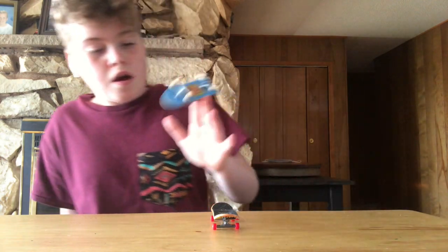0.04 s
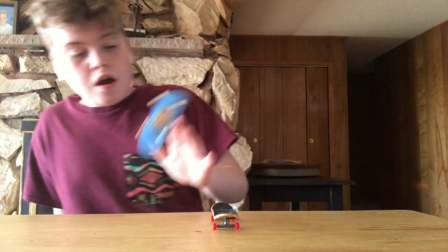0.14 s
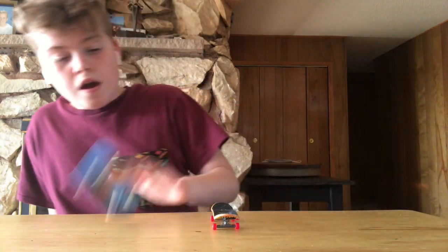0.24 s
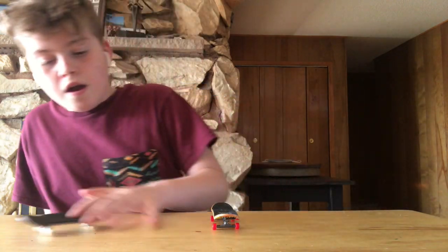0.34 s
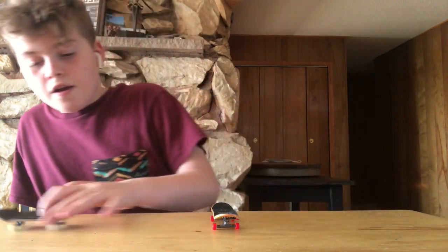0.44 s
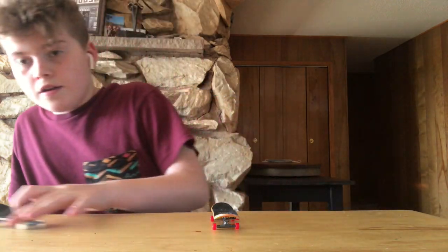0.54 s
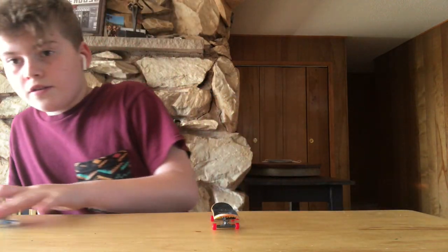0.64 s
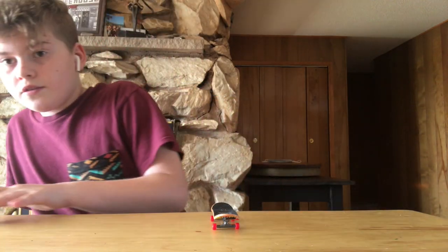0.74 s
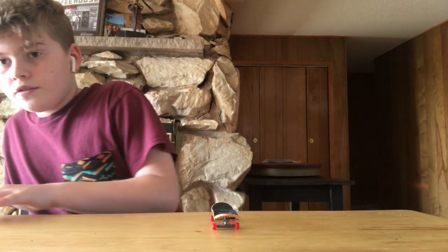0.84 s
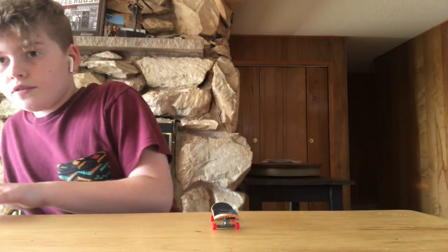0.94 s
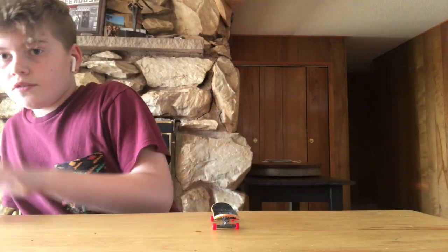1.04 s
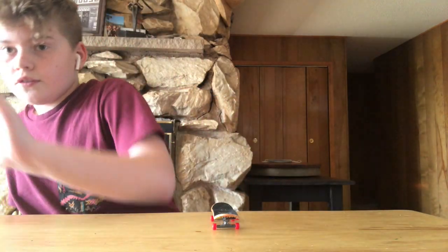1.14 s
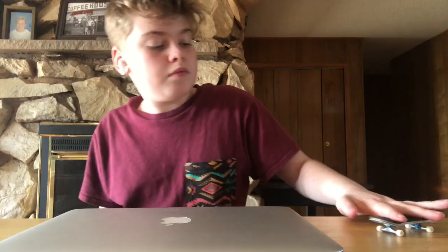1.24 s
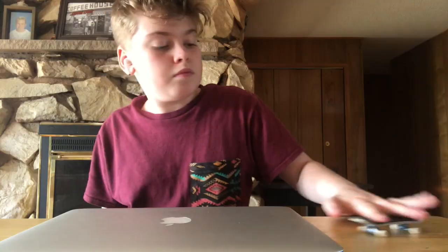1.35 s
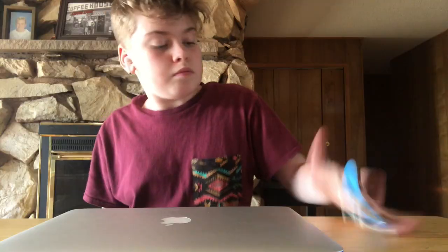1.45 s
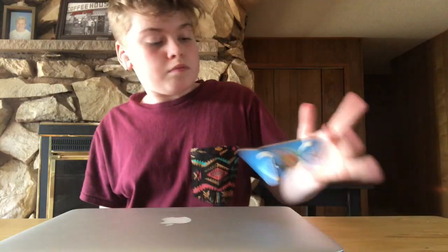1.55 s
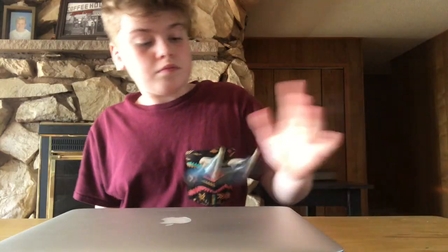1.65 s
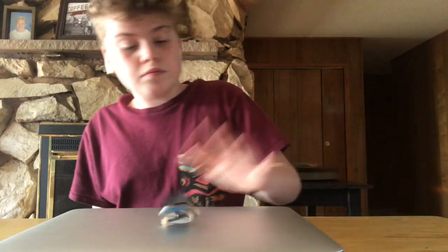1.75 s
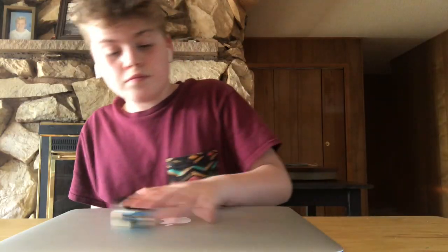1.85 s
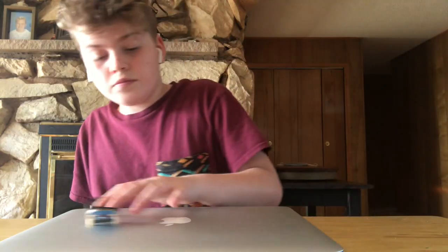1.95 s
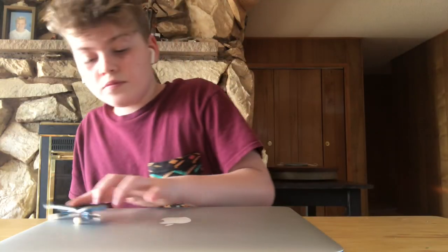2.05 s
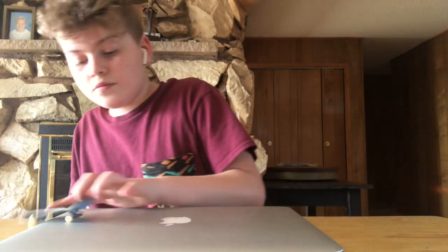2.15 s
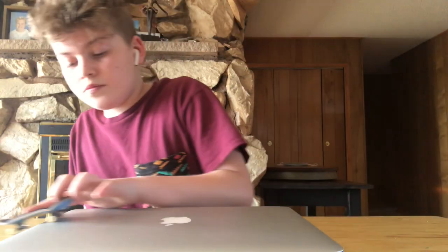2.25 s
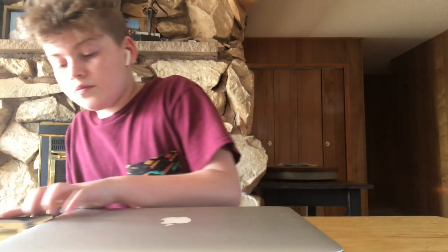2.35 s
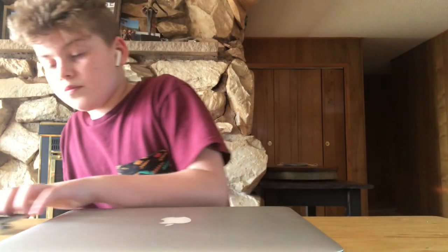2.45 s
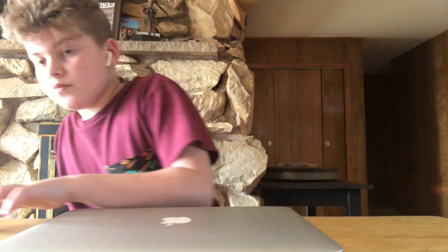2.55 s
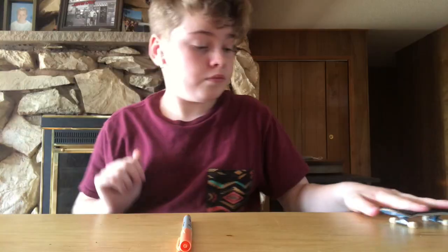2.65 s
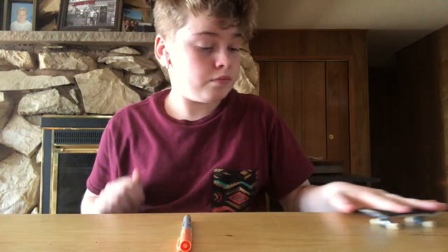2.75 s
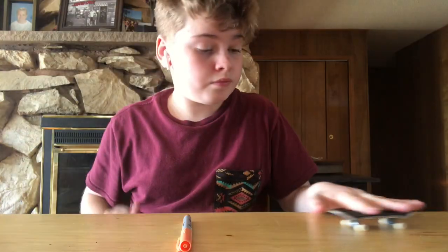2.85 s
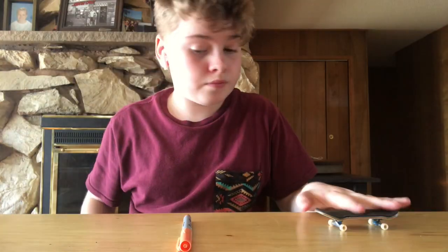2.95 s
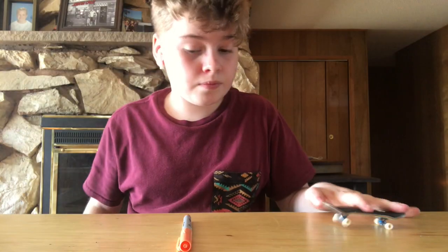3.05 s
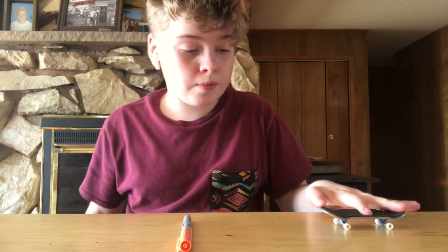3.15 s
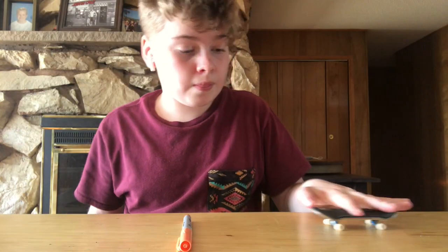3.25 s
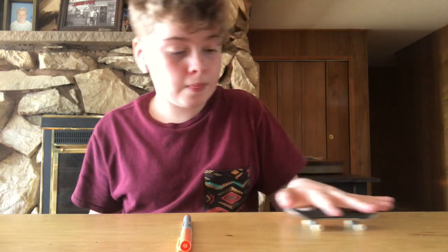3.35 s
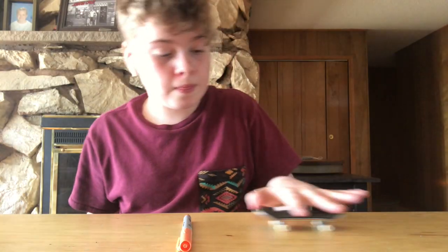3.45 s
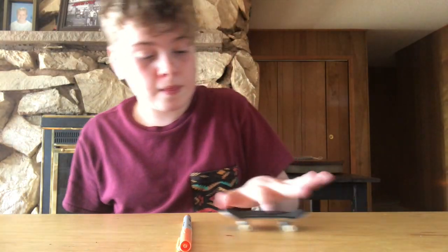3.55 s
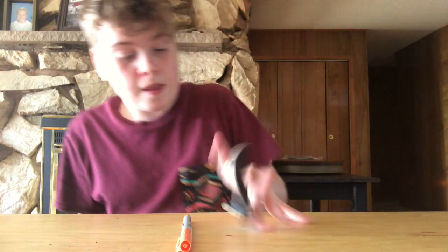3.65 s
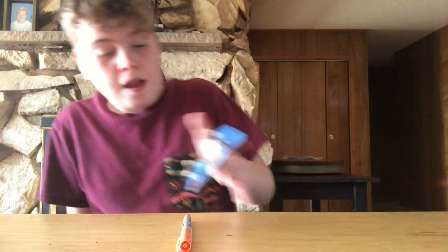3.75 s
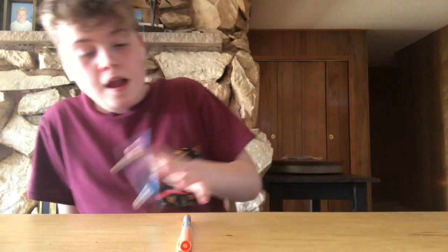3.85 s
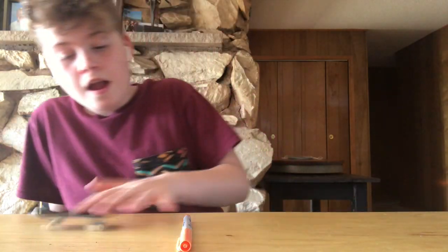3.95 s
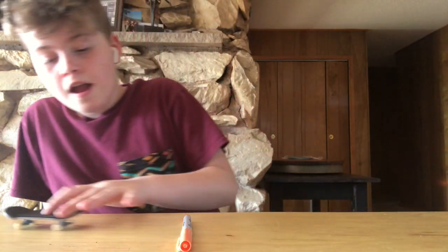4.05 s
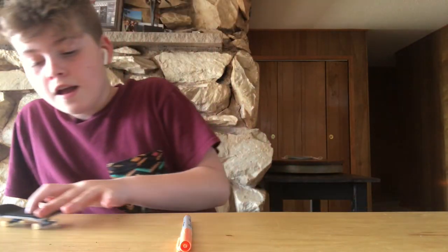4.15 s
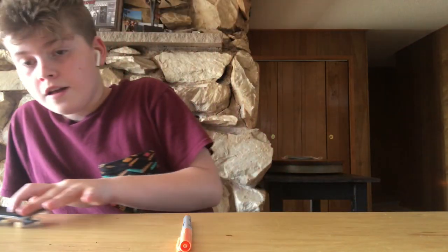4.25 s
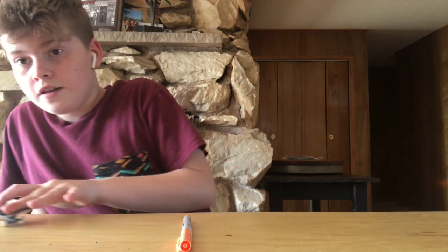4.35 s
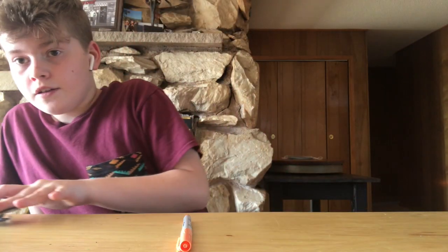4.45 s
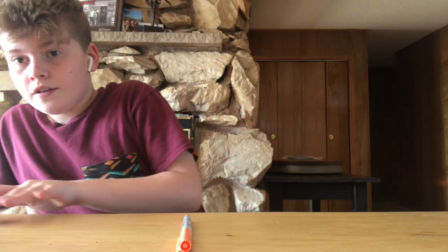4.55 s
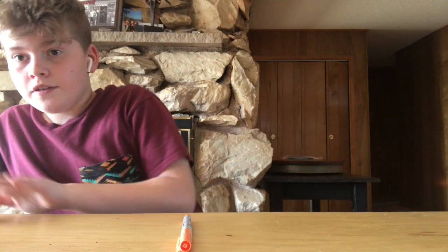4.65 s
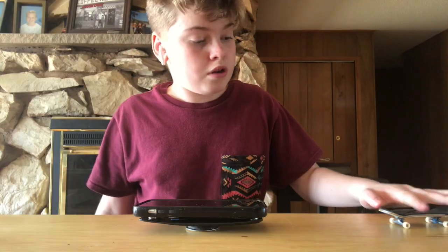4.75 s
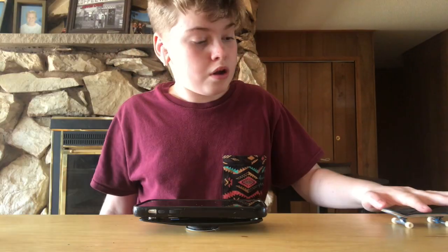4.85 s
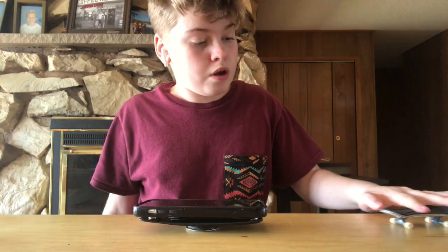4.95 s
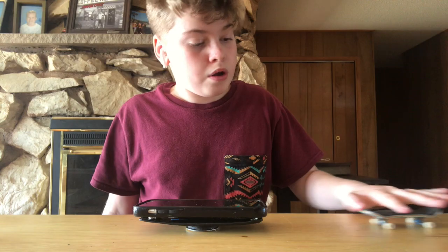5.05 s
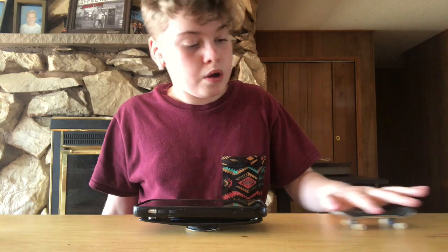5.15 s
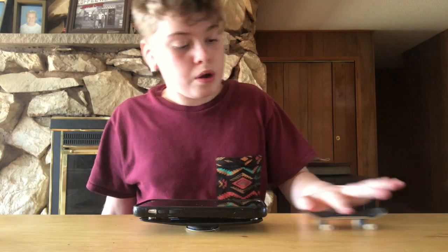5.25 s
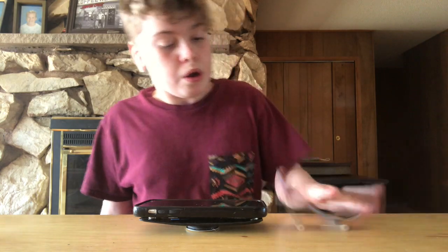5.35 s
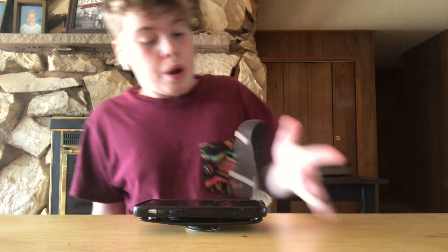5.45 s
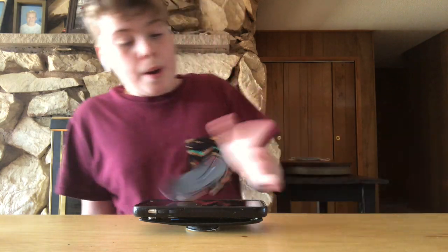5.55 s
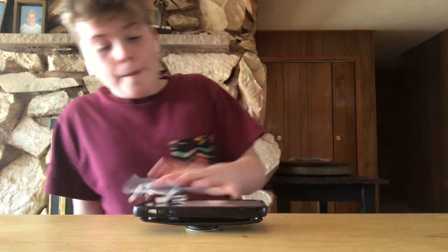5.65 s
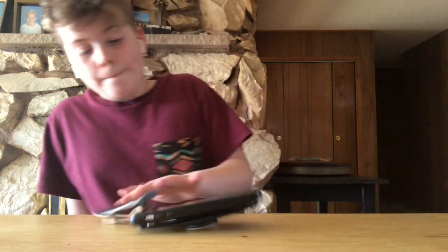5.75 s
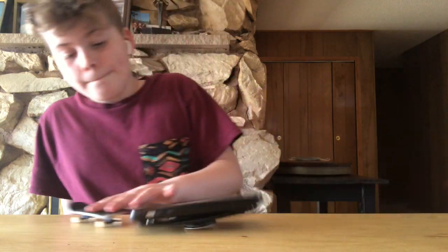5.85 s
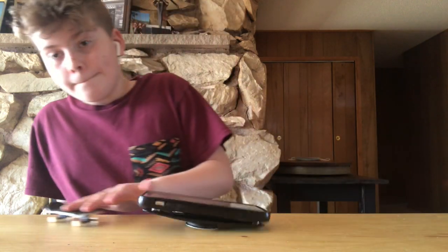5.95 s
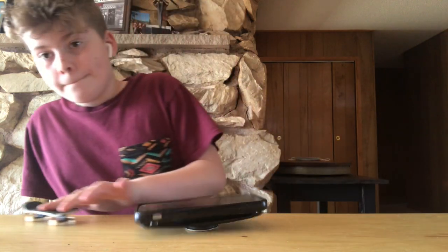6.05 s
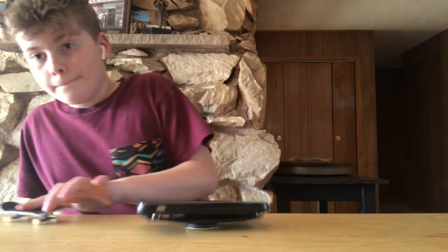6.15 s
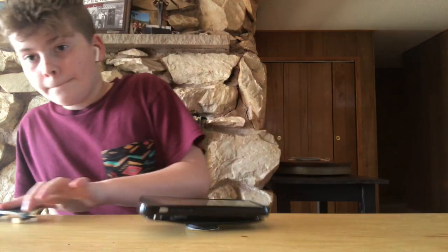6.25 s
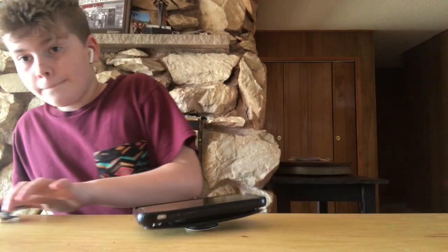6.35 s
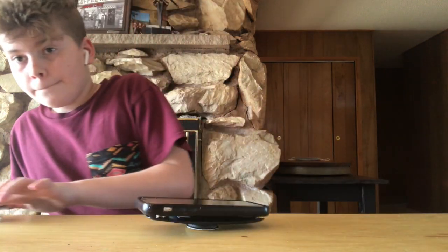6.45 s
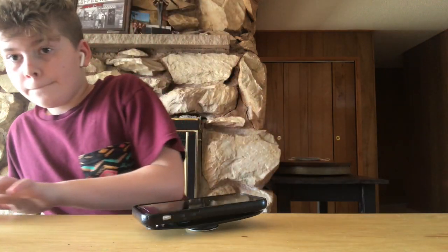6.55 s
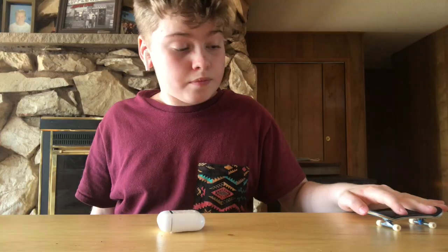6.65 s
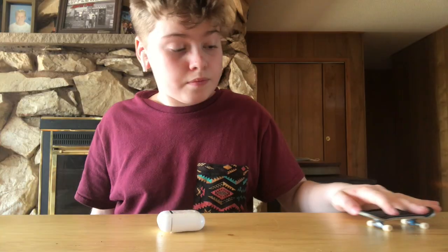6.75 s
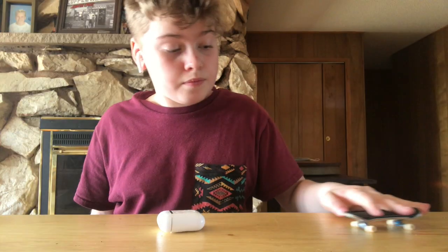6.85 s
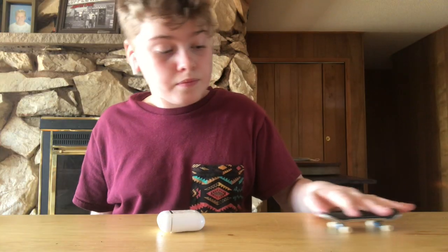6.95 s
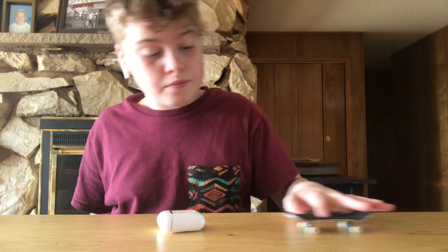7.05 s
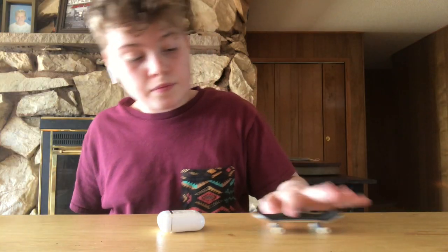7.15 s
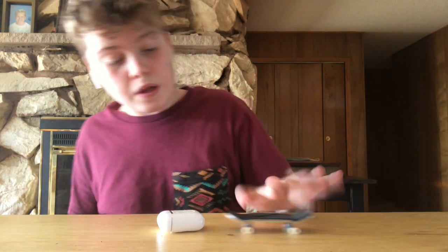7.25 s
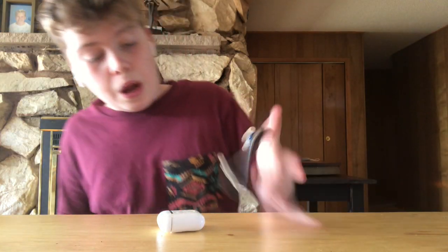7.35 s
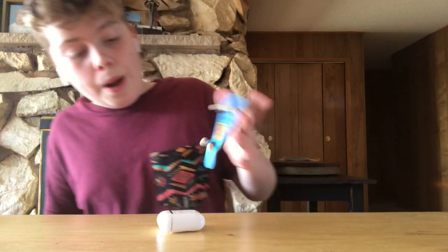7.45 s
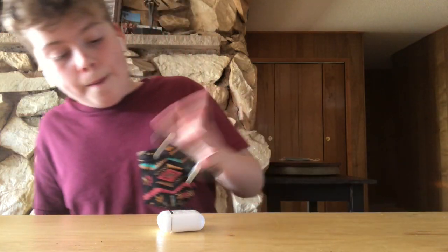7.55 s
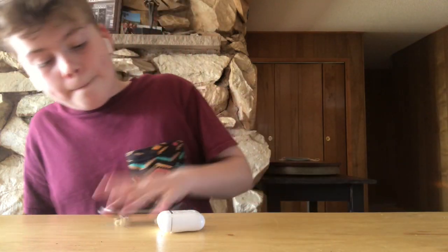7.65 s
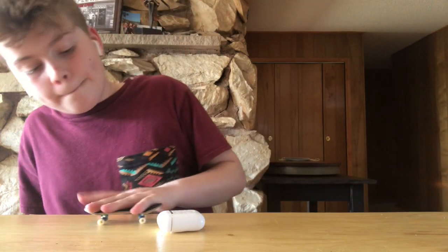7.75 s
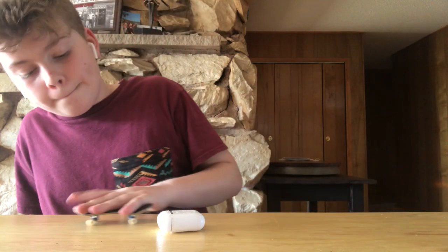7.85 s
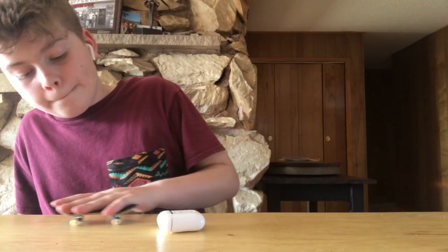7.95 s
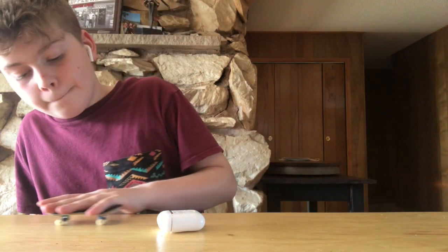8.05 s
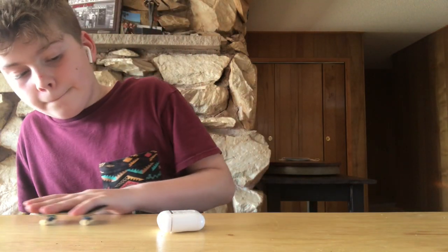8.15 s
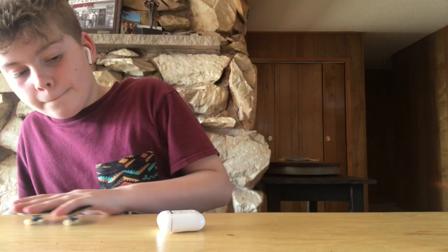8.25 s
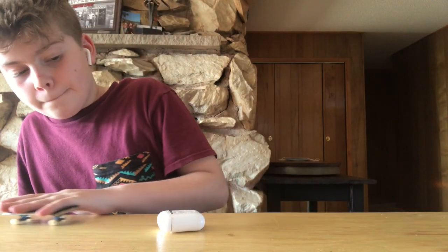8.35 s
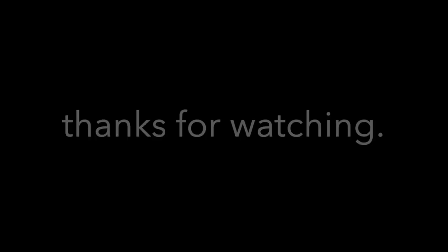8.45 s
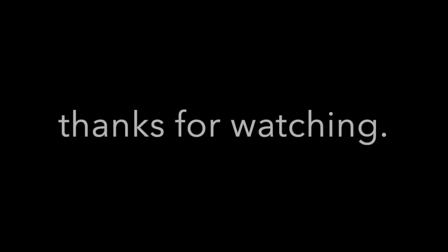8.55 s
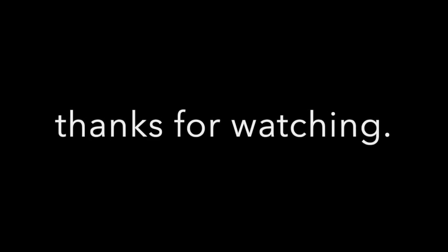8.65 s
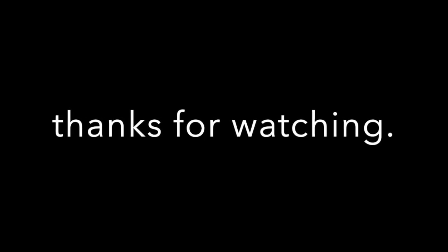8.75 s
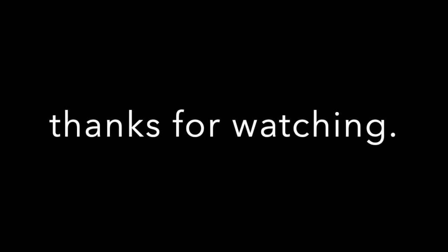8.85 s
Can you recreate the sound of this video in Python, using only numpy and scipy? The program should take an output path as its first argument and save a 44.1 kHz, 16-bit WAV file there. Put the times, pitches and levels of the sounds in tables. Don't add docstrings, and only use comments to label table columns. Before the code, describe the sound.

A finger-sized skateboard on a wooden table, close to a small microphone in a lively small room. Five attempts follow each other with tiny dips between: gritty wheel rolling, a sharp tail snap, a rattling landing, then fading roll-out. A soft, slowly beating low hum and air noise lie behind, until everything cuts to silence.

```python
import sys
import numpy as np
from scipy import signal
from scipy.fft import rfft
from scipy.io import wavfile
from scipy.ndimage import uniform_filter1d

SR = 44100
rng = np.random.default_rng(int(sys.argv[2]) if len(sys.argv) > 2 else 0)


def transcribe(signal):
    frames = np.atleast_2d(signal).T
    limited = np.clip(frames, -1, 1)
    pcm = np.round(limited * 32767).astype(np.int16)
    wavfile.write(sys.argv[1], SR, pcm)


def elevation(decibels):
    levels = np.asarray(decibels, float)
    return 10 ** (levels / 20)


N = 392483
T = np.arange(N) / SR
STEP_S = np.arange(0, N / SR, 1 / 500)
END_S = 8.439
TICK_RISE_S = .0002
LIFT_DB_PER_S = 500

# start_s, first_beat_s (from start until both motors are in phase)
TAKES = [
    (0, 0.033),
    (1.25, 0.145),
    (2.654, 0.099),
    (4.785, 0.166),
    (6.624, 0.209),
]


def evened(x):
    return x / np.sqrt(np.mean(x ** 2) + 1e-20)


def peaked(x, db):
    return elevation(db) * x / abs(x).max()


def read(points, hz):
    f, value = np.transpose(points)
    return np.interp(np.log(hz + 1), np.log(f + 1), value)


def add(mix, s, sound):
    part = mix[round(s * SR):][:len(sound)]
    part += sound[:len(part)]


def colour(x, points, size=2048):
    hz = abs(np.fft.fftfreq(size, 1 / SR))
    log_gain = np.log(elevation(np.maximum(read(points, hz), -90)))
    taps = np.fft.ifft(np.exp(log_gain - 1j * signal.hilbert(log_gain).imag)).real
    return signal.oaconvolve(x, taps[:size // 2])[:len(x)]


def drift(rate_hz):
    size = int(SR / rate_hz)
    return evened(uniform_filter1d(uniform_filter1d(rng.standard_normal(N), size), size))


def spread(x, shape):
    return shape * np.linalg.norm(x) / np.linalg.norm(shape)


def background():
    # shaft_hz, order1_db, order2_db, order3_db
    motors = [
        (58.8, -62, -73, -73),
        (53.4, -71.5, -74, -75),
    ]
    # hz, db_per_hz
    air_tone = [(30, -35.5), (50, -15.5), (80, -10), (130, 0), (200, -6.5), (350, -11), (500, -22),
                (1000, -23.5), (2000, -28.5), (6000, -36.5), (16000, -42)]
    # time_s, gain_db
    gain_curve = [(0, -1.5), (1.25, 0.5), (2.64, 1.5), (2.66, 7), (3.2, 6.5), (3.6, -0.5), (4.75, 0.5),
                  (6.6, 0), (8.44, 2.5)]
    air_db = -64.5
    start, together = np.transpose(TAKES)
    take = np.searchsorted(start, T, "right") - 1
    t = T - (start + together)[take]
    hum = np.zeros(N)
    for hz, *orders in motors:
        for k, db in enumerate(orders, start=1):
            level = np.sqrt(2) * elevation(db + 0.4 * k * drift(6.9))
            hum += level * np.cos(2 * np.pi * k * hz * t)
    air = evened(colour(rng.standard_normal(N), air_tone, size=8192))
    return elevation(np.interp(T, *np.transpose(gain_curve))) * (hum + elevation(air_db) * air)


def clack(db, hz, fizz_db, thud_db, contact_ms):
    # hz, db_per_hz
    deck_tone = [(900, -45.5), (1250, -20), (1480, 0), (1750, -2), (2100, -5.5), (2700, -2.5), (3500, -5.5),
                 (5080, -9), (6300, -10), (7140, -12.5), (8650, -14), (10000, -26), (13000, -50.5)]
    # hz, db_per_hz
    axle_tone = [(5590, -26.5), (9500, 0), (13300, 4), (15300, 1), (16100, -8), (16500, -27.5)]
    # hz, db_per_hz
    wood_tone = [(210, -33), (350, -2), (482, -8), (527, -4.5), (609, 1), (1060, -5), (1250, -10.5),
                 (1620, -31), (2750, -120)]
    # hz, level_db, t60_s
    table_modes = [(113.4, -1.5, 0.12), (165, -4, 0.1), (235.4, 10.5, 0.05), (361, 9, 0.035)]
    ring_db, ring_q, deck_low_hz = -3, 3.2, 1430
    tail_db, tail_s = -20, 0.018
    body_db, body_share, far_thud_db = -11, .55, -3
    dull_above_hz, dull_per_octave, plain_fizz_db = 4000, .5, -14

    shake = rng.standard_normal((3, 8192))
    t = np.arange(len(shake[0])) / SR
    u = t / (contact_ms * 1e-3)
    blow = u ** 2 * np.exp(1 - u ** 2)
    chatter = blow + elevation(tail_db) * np.minimum(u, 1) * np.exp(-t / tail_s)

    dull = dull_per_octave * min(fizz_db - plain_fizz_db, 0)
    tone = [(f, d + dull * max(np.log2(f / dull_above_hz), 0)) for f, d in deck_tone]
    deck = peaked(colour(shake[0] * chatter, tone), 0)
    small = signal.butter(N=6, Wn=deck_low_hz, btype="high", fs=SR, output="sos")
    ring = signal.sosfilt(small, np.sin(2 * np.pi * hz * t + 0.3 * elevation(dull) * shake[1]) * blow)
    ring = peaked(ring, ring_db)
    scale = elevation(db) / abs(deck + ring).max()
    deck, ring = scale * deck, scale * ring
    fizz = peaked(colour(shake[2] * chatter, axle_tone), db + fizz_db + 4)

    table = np.zeros(len(t))
    for k, (f, d, t60) in enumerate(table_modes):
        table += elevation(d - 60 * t / t60) * np.sin(2 * np.pi * f * t + 6 * shake[0][k])
    slow_start = 1 - np.exp(-(t / 0.0026) ** 2)
    thud = peaked(table * slow_start, db + thud_db + 2.5) * (1 - t / t[-1])
    body = peaked(colour(shake[1] * chatter, wood_tone), db + body_db + body_share * thud_db)

    click = 1. * (t == 0)
    mode = np.sin(2 * np.pi * hz * t) * np.exp(-np.pi * hz / ring_q * t)
    diffuse = spread(deck, colour(click, tone))
    diffuse += spread(ring, signal.sosfilt(small, mode))
    diffuse += spread(fizz, colour(click, axle_tone))
    return deck + ring + fizz + thud + body, diffuse + body + elevation(far_thud_db) * thud


def strike(near, scattered, rows, contact_ms):
    for s, *blow in rows:
        direct, wide = clack(*blow, contact_ms)
        add(near, s - .0003, direct)
        add(scattered, s, wide)


def tail_snaps(near, scattered):
    # start_s, peak_db, ring_hz, fizz_db, thud_db
    snaps = [
        (.2673, -12, 1807, -22, -23),
        (1.4228, -31, 2092, -15, -15),
        (1.72, -19.5, 2707, -5, -35),
        (3.5913, -23.5, 3674, -15.5, -13),
        (5.3531, -17.5, 1750, -29, -22.5),
        (5.5658, -31, 1850, -13.5, -46),
        (7.288, -19, 2670, -25, -15),
        (7.3105, -12.5, 2930, -13, -16.5),
    ]
    strike(near, scattered, snaps, contact_ms=.55)


def flat_slaps(near, scattered):
    # start_s, peak_db, ring_hz, fizz_db, thud_db
    slaps = [(.2921, -10, 2540, -17, -17), (1.0115, -52.5, 3730, -31, -6), (1.442, -21, 2900, -7, -16),
             (1.7043, -21, 1500, -6, -25.5), (1.7909, -19.5, 1242, -5.5, -14.5),
             (1.7954, -17.5, 1520, -11.5, -20), (2.3212, -22, 1610, -11, -28), (3.105, -30, 4130, -3, -18),
             (3.6165, -22, 1576, -8, -10), (3.8962, -42, 1668, -17, -7), (3.9331, -16.5, 2700, -14, -17),
             (3.9516, -21.5, 2800, -15, -14), (5.2848, -49, 3000, -29, -17), (5.378, -23.5, 1736, -11, -10),
             (5.6008, -31.5, 1830, -10.5, -25), (5.6638, -31.5, 2537, -7, -33.5),
             (5.8093, -22, 1960, -18, -34), (5.8251, -32, 2150, -26, -18), (7.6814, -17, 1763, -15, -21)]
    strike(near, scattered, slaps, contact_ms=1.9)


def truck_grazes(near, scattered):
    # start_s, peak_db, ring_hz, fizz_db, thud_db
    trucks = [
        (.9989, -44.5, 2735, -35, -16),
        (1.7359, -27, 1212, -6, -32.5),
        (5.5928, -30, 5600, -5, -27),
        (5.721, -36, 1162, -32, -32),
        (7.6515, -32, 8380, -5, -28.5),
        (7.6562, -12.5, 2812, -10.5, -36),
        (7.659, -18.5, 2740, -14, -23),
    ]
    strike(near, scattered, trucks, contact_ms=1.38)


def wheel_taps(near, scattered):
    # start_s, peak_db, ring_hz, fizz_db, thud_db
    taps = [(1.4137, -24, 2518, -11, -19), (2.163, -28, 1560, -8, -21), (2.316, -35, 2210, -5, -39),
            (2.3302, -34.5, 1624, -13, -9), (2.7698, -30, 1554, -27, -19), (3.109, -23.5, 8770, -20, -31.5),
            (3.4422, -41.5, 1980, -19.5, -21.5), (3.8882, -28, 1960, -21, -17),
            (3.9015, -25, 3990, -16, -24), (3.916, -11, 2110, -18, -26), (5.7241, -15.5, 2130, -18, -24),
            (5.8055, -30, 2082, -13, -25), (7.0145, -48, 2180, -13.5, -7.5), (7.644, -22.5, 1537, -23, -34),
            (7.6743, -20, 2247, -22, -24), (7.8968, -47.5, 1990, -17, -14)]
    strike(near, scattered, taps, contact_ms=1.0)


def knock(db, hz, t60, rise_s=0.00089):
    t = np.arange(4096) / SR
    rise = np.minimum(t / max(rise_s, 1.3 / hz), 1) ** 2
    return peaked(elevation(-60 * t / t60) * np.sin(2 * np.pi * hz * t) * rise, db - 1.5)


def ring_modes(near, scattered, rows, *shared_times):
    for s, db, hz, *times in rows:
        t60, *rise = (*times, *shared_times)
        sound = knock(db, hz, t60, *rise)
        wide = knock(db, hz, min(t60, 15 / hz), TICK_RISE_S)
        add(near, s, sound)
        add(scattered, s, spread(sound, wide))


def wheel_rings(near, scattered):
    # start_s, peak_db, pitch_hz
    rings = [(.2925, -11, 4200), (1.4421, -24, 5100), (1.7908, -37.5, 4170), (2.3211, -26.5, 4240),
             (3.106, -22.5, 6670), (3.6167, -29, 5720), (3.915, -20.5, 4070), (5.3782, -22.5, 5250),
             (5.6017, -29, 3600), (5.7229, -30, 4040), (5.8097, -32, 4040), (7.3093, -18.5, 5250),
             (7.6435, -28.5, 5500), (7.6585, -16.5, 4420), (7.6814, -19, 4260), (2.162, -31, 6400),
             (2.3205, -29, 8000), (2.7695, -39, 8000), (3.617, -24, 2900), (3.917, -26, 8200),
             (5.3785, -27, 2900), (5.7235, -26, 6700), (7.683, -21, 2900)]
    ring_modes(near, scattered, rings, .004)


def hollow_knocks(near, scattered):
    # start_s, peak_db, pitch_hz, t60_s
    knocks = [(.293, -29, 723, .026), (1.444, -41, 490, .038), (1.445, -33, 330, .03),
              (1.417, -36, 260, .03), (1.704, -33, 704, .024), (1.79, -25, 717, .016),
              (2.319, -36.5, 670, .033), (3.11, -40, 790, .035), (3.616, -37.5, 790, .035),
              (3.917, -28, 712, .034), (5.3527, -29.5, 1127, .013), (5.377, -43, 810, .043),
              (5.566, -38, 673, .015), (5.601, -40, 620, .021), (5.664, -41, 750, .017),
              (5.726, -39, 200, .063), (5.794, -36.5, 194, .048), (5.811, -39.5, 101, .063),
              (7.2878, -25, 1080, .012), (7.308, -44.5, 646, .03), (7.659, -35.5, 720, .025),
              (7.659, -36.5, 165, .046)]
    ring_modes(near, scattered, knocks)


def deck_bends(near, scattered):
    # start_s, peak_db, pitch_hz, t60_s
    bends = [(1.7915, -23, 1200, 0.014), (2.1635, -26.5, 1680, 0.023), (2.3215, -23, 1635, 0.026),
             (3.917, -30.5, 1300, 0.014), (.2935, -25.5, 1114, 0.0091), (5.7245, -20, 2326, 0.014),
             (7.6598, -12.5, 2180, .008), (7.683, -17, 1750, .012), (.722, -45, 1980, .02),
             (.781, -49, 1950, .02), (2.1602, -36, 1900, .004), (2.1605, -40, 5000, .003),
             (.2932, -15.5, 5800, .003), (1.4425, -27, 6800, .004), (3.1078, -26, 5200, .006),
             (5.569, -38, 13500, .004), (5.583, -44, 12800, .006), (5.6025, -36, 14500, .004),
             (5.6125, -38, 4000, .012), (5.602, -36, 1150, .008), (7.311, -34, 13800, .004),
             (7.6835, -24, 5200, .004), (5.8115, -29, 5400, .004), (3.1082, -14, 8770, .002),
             (1.7215, -24, 2600, .006), (1.722, -27, 1600, .01), (1.706, -25, 1700, .02),
             (1.446, -33, 1650, .05), (7.692, -35, 1650, .04)]
    ring_modes(near, scattered, bends)


def rattles(near, scattered):
    # start_s, peak_db, pitch_hz
    bounces = [(.35, -30, 3200), (1.433, -36, 3600), (1.436, -34, 4400), (1.439, -33, 3000),
               (1.46, -35, 6700), (1.482, -38, 6500), (1.482, -40, 5000), (1.705, -22, 15500),
               (1.7075, -26, 15000), (1.72, -26, 15500), (1.7915, -22, 15500), (1.7945, -24, 15000),
               (3.1045, -30, 7000), (3.1085, -22, 11200), (3.127, -33, 6800), (3.599, -42, 12000),
               (3.599, -42, 8200), (3.609, -41, 11800), (3.612, -36, 2800), (3.614, -35, 3600),
               (3.6255, -36, 11800), (3.6255, -36, 6300), (3.635, -39, 11800), (3.657, -45, 11800),
               (3.89, -38, 12500), (3.9025, -31, 8800), (3.927, -27, 4000), (5.3525, -31, 14500),
               (5.397, -34, 4000), (5.578, -46, 12800), (5.5925, -32, 15300), (5.62, -40, 4000),
               (5.637, -46, 12800), (5.673, -38, 4200), (5.683, -44, 8300), (5.742, -33, 4500),
               (5.796, -44, 14800), (5.8075, -32, 2400), (5.819, -40, 15500), (5.836, -34, 2300),
               (7.2885, -30, 15500), (7.2965, -38, 14000), (7.306, -30, 2200), (7.3075, -30, 2000),
               (7.66, -24, 13000), (7.6775, -25, 3300), (7.701, -28, 3800)]
    ring_modes(near, scattered, bounces, .0024, TICK_RISE_S * 2)


def nail_ticks(near, scattered):
    # start_s, peak_db
    nails = [(3.043, -52), (3.3174, -49), (3.327, -42), (3.3433, -44), (3.3556, -42), (3.3644, -44),
             (3.4314, -56), (3.4421, -43), (3.4481, -48), (7.9034, -60), (7.9144, -62)]
    ring_modes(near, scattered, [(*row, 7600) for row in nails], .0013, TICK_RISE_S)


def room(near, diffuse, tail_db=-9, onset_s=.012):
    # hz, t60_s
    decay = [(120, 0.54), (330, .4), (870, 0.37), (2300, 0.51), (6000, .45), (14000, 0.27)]
    # hz, level_db
    tail_tone = [(120, -4.5), (500, 4.5), (1000, 2), (1650, -4), (2600, -8.5), (5000, -2.5), (8500, -1.5),
                 (10200, -3.5), (15000, 3)]
    # delay_s, level_db, favoured_hz
    echoes = [
        (.0026, -11, 13000),
        (.0088, -13, 4000),
        (.0182, -16, 3500),
        (.0255, -19, 2500),
        (.04, -22, 11500),
    ]
    hz, t, z = signal.stft(rng.standard_normal((2, SR)), SR, nperseg=256)
    z *= elevation(read(tail_tone, hz)[:, None] - 60 * t / read(decay, hz)[:, None])
    tail = signal.istft(z, SR, nperseg=256)[1]
    tail *= 1 - np.exp(-(np.arange(tail.shape[1]) / SR / onset_s) ** 2)
    tail *= elevation(tail_db) / np.linalg.norm(tail[0])
    walls = np.zeros(SR // 10)
    u = np.arange(64) / SR
    for s, db, hz in echoes:
        bounce = np.cos(2 * np.pi * hz * u) * np.exp(-1.5 * hz * u) + 3.5 * (u == 0)
        add(walls, s, elevation(db) * bounce / abs(rfft(bounce)).max())
    late = signal.fftconvolve(diffuse, tail, axes=1).sum(axis=0)
    return signal.oaconvolve(near, walls)[:N] + late[:N]


def motion(start, end, from_db, to_db, stop_db_per_s, start_db_per_s=260):
    edges = [s for s, _ in TAKES] + [END_S]
    take = np.searchsorted(edges, (start + end) / 2)
    edge = -start_db_per_s * np.maximum(start - STEP_S, 0) - stop_db_per_s * np.maximum(STEP_S - end, 0)
    edge -= 200 * ((STEP_S < edges[take - 1]) | (STEP_S > edges[take]))
    return np.interp(STEP_S, [start, end], [from_db, to_db]), edge


def stroke(start, end, from_db, to_db, press_db, scrape_db, stop_db_per_s):
    speed, edge = motion(start, end, from_db, to_db, stop_db_per_s)
    rumble = press_db + .35 * (speed - (from_db + to_db) / 2)
    return edge + np.array([rumble, speed, speed + scrape_db])


def uneven(x, patch_db=1.6, ripple_db=1.1):
    z = signal.stft(x, nperseg=1024)[2]
    patches = rng.standard_normal(z.T.shape).T
    ripple = evened(uniform_filter1d(patches[:, 0], size=3))[:, None]
    patches = uniform_filter1d(uniform_filter1d(patches, size=9, axis=0), size=4, axis=1)
    return signal.istft(z * elevation(patch_db * evened(patches) + ripple_db * ripple), nperseg=1024)[1][:N]


def grain_ticks(grains_per_s=5000, spread_db=2.4, flutter_db=.7):
    size = elevation(spread_db * np.minimum(rng.exponential(1, N), 3)) * rng.standard_normal(N)
    ticks = evened(size * (rng.random(N) < grains_per_s / SR)) + 0.46 * rng.standard_normal(N)
    return uneven(ticks) * elevation(flutter_db * drift(40))


def layer(ticks, level_db, tone):
    return np.interp(T, STEP_S, elevation(level_db)) * evened(colour(ticks, tone))


def rolling(ticks):
    # start_s, end_s, start_speed_db, end_speed_db, pressure_db
    run_ups = [(1.25, 1.4, -55, -61, -67), (2.2, 2.3, -64, -64, -73), (2.658, 2.76, -63, -56, -54),
               (3.27, 3.36, -67, -58, -59), (3.4, 3.58, -56, -63, -65), (4.98, 5.11, -68, -60, -69),
               (5.12, 5.26, -58, -58, -63), (5.27, 5.34, -61, -58, -71), (6.72, 7.06, -75, -58, -68),
               (7.07, 7.28, -60, -64, -65)]
    # start_s, end_s, start_speed_db, end_speed_db, pressure_db
    roll_outs = [(.42, .77, -55, -62, -66), (1.86, 2.05, -57, -58, -65), (2.4, 2.64, -60, -71, -66),
                 (2.79, 2.87, -51, -57, -55), (2.95, 3.07, -70, -68, -71), (4.05, 4.35, -57, -70, -68),
                 (4.4, 4.56, -82, -82, -71), (4.59, 4.78, -71, -82, -73), (5.9, 6.25, -59, -67, -64),
                 (6.28, 6.62, -71, -73, -66), (7.86, 7.92, -62, -64, -78), (7.98, 8.12, -70, -80, -76),
                 (8.18, 8.27, -75, -75, -77), (8.36, 8.42, -74, -72, -78)]
    # rumble_db, hum_db, scrape_db
    rest_db = [-85, -86, -82]
    # hz, db_per_hz
    table_tone = [(210, -33), (350, -5), (500, -7), (620, -3), (760, 1), (900, -7), (1090, -9), (1300, -15),
                  (2750, -90)]
    # hz, db_per_hz
    pushed_tone = [(1000, -28), (1250, -9.5), (1420, -7), (1600, 1.5), (1790, -3.5), (1980, 1), (2250, -4),
                   (2750, -5), (3250, -9), (4200, -38.5)]
    # hz, db_per_hz
    free_tone = [(1050, -28), (1300, -9), (1620, 0), (1980, 2), (2250, -4), (2800, -5), (3400, -9),
                 (4300, -38)]
    # hz, db_per_hz
    scrape_tone = [(2500, -24), (3400, -0.5), (3900, 0.5), (4500, -5.5), (5200, -5), (6300, -8.5),
                   (7400, -18), (9000, -19), (10300, -24), (13000, -22), (16000, -30)]
    push = np.max([stroke(*row, scrape_db=-11, stop_db_per_s=LIFT_DB_PER_S) for row in run_ups], axis=0)
    coast = np.max([stroke(*row, scrape_db=-9, stop_db_per_s=120) for row in roll_outs], axis=0)
    both = np.maximum(np.maximum(push, coast), np.array(rest_db)[:, None])
    rumble = layer(ticks, both[0], table_tone)
    pushed = layer(ticks, np.maximum(push[1], rest_db[1]), pushed_tone)
    free = layer(ticks, coast[1], free_tone)
    return rumble + pushed + free + layer(ticks, both[2], scrape_tone)


def finger_slides(ticks):
    # start_s, end_s, start_db, end_db
    slides = [(1.25, 1.4, -68, -71), (2.175, 2.3, -64, -74), (2.66, 2.76, -65, -70), (2.78, 2.88, -62, -75),
              (3.13, 3.28, -63, -78), (3.28, 3.365, -72, -64), (3.44, 3.53, -78, -80)]
    # hz, db_per_hz
    grit_tone = [(3500, -24), (5000, -2), (6500, -4), (8700, 0), (10200, -14), (13000, -27), (16500, -36)]
    level_db = np.max([sum(motion(*row, LIFT_DB_PER_S)) for row in slides], axis=0)
    return layer(ticks, level_db, grit_tone)


def deck_buzz(ticks):
    # start_s, end_s, start_db, end_db
    buzzes = [
        (5.732, 5.8, -49, -51),
        (5.815, 5.86, -50, -57),
        (5.608, 5.66, -60, -64),
    ]
    # hz, db_per_hz
    buzz_tone = [(1300, -30), (1700, -10), (2070, 0), (2340, -1), (2900, -14), (3900, -11), (5500, -17),
                 (9000, -35)]
    level_db = np.max([sum(motion(*row, LIFT_DB_PER_S, start_db_per_s=3000)) for row in buzzes], axis=0)
    return layer(ticks, level_db, buzz_tone)


def scene():
    near, diffuse = np.zeros(N), np.zeros((2, N))
    for blows in (tail_snaps, flat_slaps, truck_grazes, wheel_taps):
        blows(near, diffuse[0])
    for modes in (wheel_rings, hollow_knocks, deck_bends, rattles, nail_ticks):
        modes(near, diffuse[1])
    ticks = grain_ticks()
    moving = rolling(ticks) + finger_slides(ticks) + deck_buzz(ticks)
    return (background() + near + room(near, diffuse) + moving)[None]


def band_limit(x):
    return signal.sosfilt(signal.butter(12, 17010, fs=SR, output="sos"), x)


def record(dry):
    dip_s, end_fade_s = 0.0075, 0.0018
    splices = np.array(TAKES)[1:, :1]
    dips = np.clip(abs(T - splices) / dip_s, 0, 1).min(axis=0)
    fade = dips * np.clip((END_S - T) / end_fade_s, 0, 1)
    low_cut = signal.butter(N=2, Wn=42, btype="high", fs=SR, output="sos")
    top = signal.firwin(numtaps=255, cutoff=16400, window="blackman", fs=SR)
    heard = signal.oaconvolve(signal.sosfilt(low_cut, dry), top[None], "same")
    return band_limit(heard * fade)


dry = scene()
out = record(dry)
transcribe(out)
```